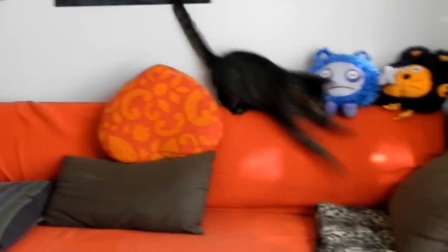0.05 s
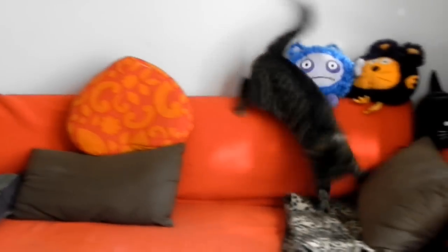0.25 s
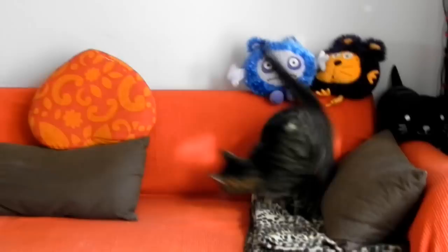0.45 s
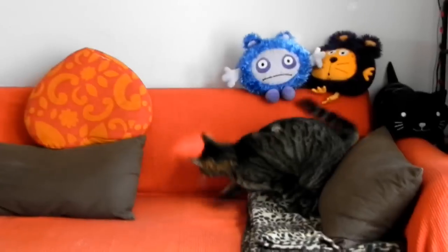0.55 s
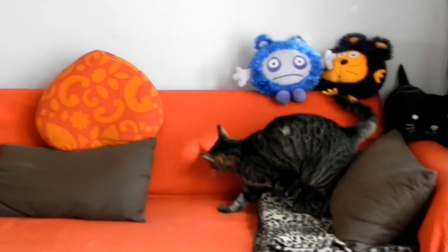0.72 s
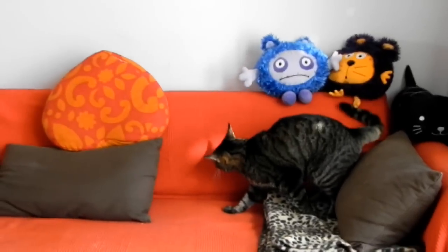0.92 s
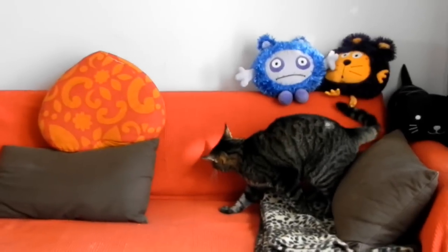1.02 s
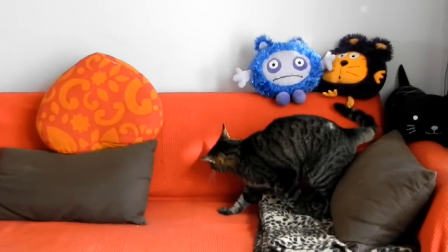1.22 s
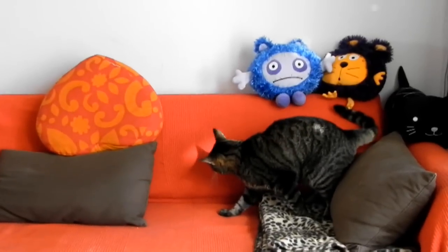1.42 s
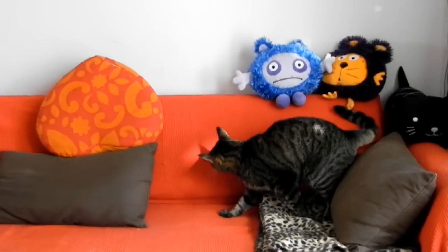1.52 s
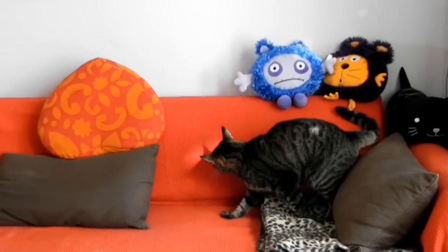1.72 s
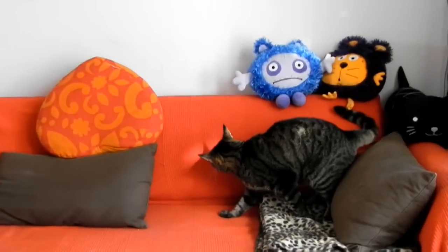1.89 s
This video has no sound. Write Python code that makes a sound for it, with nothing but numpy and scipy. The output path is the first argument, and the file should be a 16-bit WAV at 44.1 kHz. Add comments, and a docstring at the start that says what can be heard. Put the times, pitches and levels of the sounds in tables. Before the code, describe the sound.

A cat scrambles on a sofa: light scratchy cloth and soft paw bumps from 0 s, busier thuds and claw snags from 0.2 s, the strongest landing around 0.45 s. Smaller thumps follow, one clear at 0.74 s, ending by about 0.95 s. Faint lens-motor ticks, about fifteen a second, run from 0.6 s to the end over quiet room hiss and low wavering hum. A tiny fur brush comes near 1.1 s.

```python
"""Claws and cloth crackle over a quiet, humming room: a cat scrambles along a sofa back, drops and stops.
Shaped noise makes the cloth, fur and hush; wavering tones and narrow noise make the hum.
Paws thump as short swinging tones with a ringing frame and a slap of noise; snags are brief pings.
From before the cat stops, a lens motor inside the camera ticks fifteen times a second (rung noise pulses).
The stereo microphone hears bass in the middle and spreads the mids wide."""
import sys
import numpy as np
from scipy import signal
from scipy.fft import rfft, irfft
from scipy.io import wavfile
from scipy.ndimage import uniform_filter1d

SR = 44100
rng = np.random.default_rng(int(sys.argv[2]) if len(sys.argv) > 2 else 0)


def attenuation_scalar(level_db):
    """Turn a level in dB into a linear amplitude multiplier (20 dB per decade)."""
    decades = np.asarray(level_db, float) / 20
    return 10 ** decades


def transcribe(signal):
    """Save signal, clipped to [-1, 1], as a 16-bit WAV file at the path in sys.argv[1]."""
    frames = np.atleast_2d(signal).T
    limited = np.clip(frames, -1, 1)
    pcm = np.round(limited * 32767).astype(np.int16)
    wavfile.write(sys.argv[1], SR, pcm)


N = 85995  # length in samples

# Scrambling effort over time:
# [t/s, cloth level/dB before CLOTH_DB, frame shake level/dB before SHAKE_DB, spring sway level/dB, rasp 0-1]
EFFORT = [(0.0, -43, -32, -60, 0.93), (0.042, -49, -31, -48, 0.76), (0.074, -49, -43, -54, 0.3),
          (0.112, -46.5, -30.5, -57, 1), (0.15, -57.5, -40, -59, 0.94), (0.202, -45.5, -44, -46, 0.4),
          (0.228, -34, -26, -45, 0.09), (0.258, -43, -27.5, -57, 0), (0.302, -46.5, -30, -53.5, 0.4),
          (0.316, -39, -27, -46, 0.7), (0.35, -30.5, -27, -58, 0.71), (0.376, -34.5, -28, -62, 0.48),
          (0.438, -31.5, -31, -50, 0.27), (0.456, -32.5, -22, -51, 0.66), (0.48, -32, -19, -29.5, 0.38),
          (0.626, -56, -39.5, -56, 0.47), (0.666, -49, -27.5, -42, 0.44), (0.716, -53, -46, -44, 0.5),
          (0.738, -45, -28, -53, 0.85), (0.762, -52, -18, -49, 0.6), (0.798, -46.5, -29.5, -56, 0.34),
          (0.848, -70, -31, -46, 0.55), (0.866, -45.5, -34, -57, 0.35), (0.92, -58, -54, -73, 0.6)]
# Cloth scraped with full rasp: [f/Hz, relative level per Hz/dB]
RASPY_CLOTH = [(150, -19), (250, -5.5), (303, -9), (566, -10.5), (651, -12.5), (1610, -13.5), (3170, -23.5),
               (5830, -38.5), (16000, -51)]
# Cloth pressed without rasp: [f/Hz, relative level per Hz/dB]
DULL_CLOTH = [(150, -32), (250, -5), (723, -7), (1280, -25), (1610, -18.5), (1880, -37), (16000, -52.5)]
# Ways the sofa frame rings: [f/Hz, level/dB before weighting by ring length, ring length/s]
FRAME_MODES = [(97, -4.5, .1), (117.4, 0.5, 0.11), (176.4, 1, .07), (266.4, -2.5, 0.054),
               (339.3, -6.5, 0.07), (409.5, -2.5, 0.052), (554, -6.5, 0.044), (692, -3, 0.035)]
CLOTH_DB, SHAKE_DB = 2.5, -8.5  # added to the effort levels
GRAINS_PER_S, NUDGES_PER_S, GRAIN_SPREAD_DB = 1200, 1500, 4.0
SWAY_HZ, SWAY_WANDER_HZ, SWAY_WIDTH_HZ = 54, 1.9, 7.6  # pitch, its wander, how fast it wanders

# Hush in the middle: [f/Hz, relative level per Hz/dB]
HUSH_MID_SPECTRUM = [(15, -26), (25, -16), (70, -18), (113, -5), (161, -8), (222, -7.5), (307, -15),
                     (402, -3), (460, -10.5), (688, -5.5), (788, -12.5), (1120, -16), (1590, -16),
                     (1920, -18.5), (3860, -22.5), (8450, -31.5), (12300, -41), (15700, -39.5)]
# Hush at the sides: [f/Hz, relative level per Hz/dB]
HUSH_SIDE_SPECTRUM = [(15, -84), (25, -32), (113, -20.5), (161, -20), (268, -20.5), (402, -1.5),
                      (688, -10.5), (901, -11), (2720, -22), (3380, -25.5), (8000, -36.5), (12300, -48),
                      (15700, -48)]
# Wavering drones: [f/Hz, width of each of two filter passes/Hz, level/dB]
DRONES = [(54, 14, -67.5), (118, 15, -59.5), (250, 12, -56), (404.4, 25, -61), (544, 36, -64.5)]
HUSH_MID_DB, HUSH_SIDE_DB = -50, -43
TONE_HZ, TONE_DB, TONE_WAVER_HZ, TONE_SWELL_DB = 216.3, -53, 2.4, 2  # the steadiest drone

# How long each band of the room takes to fade by 60 dB: [f/Hz, t/s]
ROOM_FADE = [(100, 0.13), (500, 0.3), (2000, 0.29), (8000, 0.13)]
ROOM_DB = -11
# How wide the cat sounds: [f/Hz, level of side against mid/dB]
SIDE_LEVEL = [(60, -17.5), (150, -26), (300, -8), (600, -3), (2000, -2), (8000, -8.5), (15000, -6)]
LEAN = -0.45  # share of the mid put straight into the side: the cat is to the right
SCATTER_RAD = 3.38  # spread of phase between the two microphone ports
RIGHT_DB = 0.5  # the right port is a little more sensitive

# Paw landings: [t/s, landing level/dB, pitch f/Hz, number of swings, slap level against landing/dB]
LANDINGS = [(0.04, -31.5, 192, 2.9, -7.5), (0.181, -29.5, 192, 3.5, -12), (.219, -21.5, 185.8, 5.9, -16),
            (.267, -27, 125, 2.7, -17), (.317, -18, 368, 3.46, -14), (0.345, -19.5, 229, 4.3, -16),
            (.384, -26, 230, 4.2, -31), (0.408, -26, 401, 5.8, -20), (.452, -11.5, 200, 3.74, -12.5),
            (.456, -20, 118, 5.3, -12), (.483, -20, 193, 4.4, -10.5), (0.515, -21.5, 214, 5.5, -12),
            (.533, -34, 137, 2.6, -18.5), (0.59, -29.5, 390, 4, -8), (.640, -35, 160, 3.3, -6.5),
            (0.664, -39, 125, 4.5, -5), (.737, -17.5, 194.3, 4.27, -20), (.739, -27, 108, 3.7, -16),
            (.770, -30, 142, 2.9, -14), (0.802, -26.5, 152.6, 4.28, -15.5)]
# Pad slapping cloth: [f/Hz, relative level per Hz/dB]
SLAP_SPECTRUM = [(200, -17.5), (400, -7.5), (800, -8.5), (1500, -17.5), (2500, -21), (4000, -46),
                 (7500, -36), (16000, -55)]
RING_DB, PUSH_DB = -11.5, -3.5  # frame ring and cushion push, against the landing level
KNOCK_S, SLAP_RISE_S, SLAP_FADE_S = 0.003, 0.0032, 0.057  # the fade is by 60 dB
PUSH_LATE, PUSH_FLAT = 1.1, 0.4  # powers shaping the cushion's swell

# Brushes of fur, mostly treble: [start t/s, length t/s, level at the crest/dB]
FUR_BRUSHES = [(0.066, 0.09, -55), (0.21, 0.073, -57.5), (0.444, 0.014, -46), (0.54, 0.17, -59),
               (1.083, 0.072, -57.5), (1.106, 0.014, -54)]
# Sound of fur: [f/Hz, relative level per Hz/dB]
FUR_SPECTRUM = [(1000, -4), (2500, 13.5), (5000, 6), (9000, 3.5), (13000, -4.5), (16000, -11)]

# Claw snags: [t/s, level/dB, pitch f/Hz]
CLAW_SNAGS = [(.210, -21.5, 590), (0.225, -24.5, 1250), (0.331, -19.5, 2470), (.354, -12, 1160),
              (0.393, -30, 1700), (.451, -16, 1490), (.457, -11.5, 2010), (0.459, -32, 1060),
              (0.465, -18.5, 1500), (0.484, -27, 2150), (0.74, -37, 1190)]
SNAG_Q = 4.5  # higher rings longer

# Lens motor steps:
# [t/s, ring level/dB, knock level/dB before KNOCK_DB, knock f/Hz, zip level/dB before ZIP_DB]
MOTOR_STEPS = [(0.595, -42, -45, 684, -47.5), (0.6679, -41, -44, 540, -52.5),
               (0.7307, -39, -33.5, 515, -59), (0.7939, -41, -39, 543, -48.5),
               (0.8631, -43, -42.5, 470, -46), (0.9269, -34, -45, 544, -49),
               (0.9993, -42, -40.5, 672, -50.5), (1.066, -41.5, -41.5, 544, -52),
               (1.1293, -39, -41.5, 650, -47.5), (1.1977, -37.5, -44, 780, -53),
               (1.2625, -37, -47.5, 697, -46.5), (1.3287, -35, -44.5, 650, -50.5),
               (1.3959, -55, -40, 650, -46), (1.4634, -36, -41.5, 530, -50),
               (1.5328, -37.5, -39.5, 705, -54), (1.5938, -36.5, -39.5, 670, -50),
               (1.6644, -41.5, -42.5, 530, -54), (1.7318, -42, -45, 550, -51),
               (1.7963, -43.5, -40.5, 556, -43.5), (1.8651, -38.5, -43, 544, -51),
               (1.9281, -36, -38.5, 544, -47.5)]
# Resonances, each used as two filters in a row, the second three times as wide.
# Motor housing: [f/Hz, width/Hz of the first filter, level/dB]
HOUSING_MODES = [(1560, 110, 0), (1870, 120, -11), (2220, 120, -12)]
# Camera body: [f/Hz, width/Hz of the first filter, level/dB]
BODY_MODES = [(416, 68, -12.5), (522, 184, 0.5), (920, 93, -13)]
# Brief zip: [f/Hz, width/Hz of the first filter, level/dB]
ZIP_MODES = [(2600, 250, -4), (2950, 250, -7), (3900, 260, 0), (4500, 450, -3)]
STEP_S, KNOCK_STEP_S, ZIP_STEP_S = 0.0015, 0.0072, 0.003  # drive times; each push peaks at half its time
KNOCK_WIDTH_HZ = 105
KNOCK_DB, ZIP_DB, KNOCK_SIDE_DB = 4, 4, 1  # added to the step levels; the last for the side only


def evened(x):
    """Scales a sound to an average (rms) level of 1."""
    return x / np.sqrt(np.mean(x ** 2) + 1e-20)


def read(points, hz):
    """Reads a table between its points, with pitch on a log scale."""
    f, value = np.transpose(points)
    return np.interp(np.log(hz + 1), np.log(f + 1), value)


def add(mix, s, sound):
    """Adds a sound into the mix at time s, cutting it at the end."""
    part = mix[max(round(s * SR), 0):][:len(sound)]
    part += sound[:len(part)]


def colour(x, points):
    """Filters a sound to the given spectrum, with no sound ahead of its cause (minimum phase)."""
    hz = abs(np.fft.fftfreq(8192, 1 / SR))
    log_gain = np.log(attenuation_scalar(np.maximum(read(points, hz), -90)))
    phase = signal.hilbert(log_gain).imag
    taps = np.fft.ifft(np.exp(log_gain - 1j * phase)).real[:4096]
    return signal.oaconvolve(x, taps)[:len(x)]


def resonate(x, hz, width):
    """One resonance with a gain of about 1 at its pitch; a narrower one rings longer."""
    r = np.exp(-np.pi * abs(width) / SR)
    return 2 * signal.lfilter([1 - r], [1, -r * np.exp(2j * np.pi * hz / SR)], x).real


def slow(width):
    """Slow random wander: noise smoothed twice, after a second to settle."""
    smooth = resonate(rng.standard_normal(N + SR), 0, width)
    return evened(resonate(smooth, 0, width)[SR:])


def grains(per_s):
    """Sparse clicks at random times with random sign, a few of them large."""
    chance, sign, size = rng.random((N, 3)).T
    height = attenuation_scalar(-GRAIN_SPREAD_DB * np.log(size * 0.99 + 0.01))
    return (chance < per_s / SR) * np.sign(sign - 0.5) * height


def frame(x):
    """The sofa frame rings with its modes, alternately in and out of step."""
    out = 0
    for k, (hz, db, ring_s) in enumerate(FRAME_MODES):
        out = out + (-1) ** k * attenuation_scalar(db) * ring_s * resonate(x, hz, 1.5 / ring_s)
    return out


def scramble():
    """Claws and cloth crackle, small nudges shake the frame and springs sway, following the effort."""
    s, cloth_db, shake_db, sway_db, rasp = np.transpose(EFFORT)
    t = np.arange(N) / SR
    rasp = np.clip(np.interp(t, s, rasp), 0, 1)
    drag = evened(grains(GRAINS_PER_S)) + rng.standard_normal(N)
    cloth = rasp * evened(colour(drag, RASPY_CLOTH)) + (1 - rasp) * evened(colour(drag, DULL_CLOTH))
    nudges = uniform_filter1d(grains(NUDGES_PER_S), size=30)
    shake = evened(frame(nudges))
    sway_hz = SWAY_HZ + SWAY_WANDER_HZ * slow(SWAY_WIDTH_HZ)
    sway = np.sqrt(2) * np.sin(2 * np.pi * np.cumsum(sway_hz) / SR)
    # past the last row every part falls away
    out = cloth * attenuation_scalar(CLOTH_DB + np.interp(t, s, cloth_db, right=-99))
    out += shake * attenuation_scalar(SHAKE_DB + np.interp(t, s, shake_db, right=-99))
    out += sway * attenuation_scalar(np.interp(t, s, sway_db, right=-99))
    return out


def hush():
    """Room air and microphone hiss as shaped noise, plus low drones; returns mid and side."""
    mid_noise, side_noise = rng.standard_normal((2, N))
    mid = attenuation_scalar(HUSH_MID_DB) * evened(colour(mid_noise, HUSH_MID_SPECTRUM))
    side = attenuation_scalar(HUSH_SIDE_DB) * evened(colour(side_noise, HUSH_SIDE_SPECTRUM))
    for hz, width, db in DRONES:
        drone = resonate(rng.standard_normal(N), hz, width)
        mid += attenuation_scalar(db) * evened(resonate(drone, hz, width))
    tone_hz = TONE_HZ + TONE_WAVER_HZ * slow(8.7)
    tone = np.sqrt(2) * np.sin(2 * np.pi * np.cumsum(tone_hz) / SR)
    mid += attenuation_scalar(TONE_DB + TONE_SWELL_DB * slow(12)) * tone
    return np.array([mid, side])


def room(x):
    """Echoes blur into a short tail of noise, each band dying at its own speed."""
    hz, t, z = signal.stft(rng.standard_normal(SR // 2), SR, nperseg=256)
    fade = attenuation_scalar(-60 * t / read(ROOM_FADE, hz)[:, None])
    tail = signal.istft(z * fade, SR, nperseg=256)[1]
    return signal.fftconvolve(x, tail / np.linalg.norm(tail))[:N]


def stereo_side(cat):
    """The ports hear each pitch with a different phase; returns the side signal, room included."""
    z = rfft(cat)
    wander = uniform_filter1d(rng.standard_normal(len(z)), size=300)
    turn = SCATTER_RAD * evened(uniform_filter1d(wander, size=300))
    side = (LEAN + np.exp(1j * turn)) * z + attenuation_scalar(ROOM_DB) * rfft(room(cat))
    return irfft(side * attenuation_scalar(read(SIDE_LEVEL, np.fft.rfftfreq(N, 1 / SR))), N)


def paws():
    """Each landing: the cushion swings a few times, the frame rings on, the pad slaps the cloth."""
    out, t = np.zeros(N), np.arange(SR // 2) / SR
    ring = frame(np.sin(np.pi * np.minimum(t / KNOCK_S, 1)) ** 2)
    ring = attenuation_scalar(RING_DB) * ring / abs(ring).max()
    for s, db, hz, swings, slap_db in LANDINGS:
        u = np.minimum(t * hz / max(swings, 1), 1)  # 0 to 1 over the swings
        swell = abs(np.sin(np.pi * u ** PUSH_LATE)) ** PUSH_FLAT * (u < 1)
        push = attenuation_scalar(PUSH_DB) * swell * np.sin(2 * np.pi * hz * t)
        slap = evened(colour(rng.standard_normal(len(t)), SLAP_SPECTRUM))
        slap = slap * np.minimum(t / SLAP_RISE_S, 1) * attenuation_scalar(slap_db - 60 * t / SLAP_FADE_S)
        add(out, s, attenuation_scalar(db) * (push + ring + slap))
    return out


def brushes():
    """Fur brushes past: shaped noise that swells and fades in a smooth hump."""
    t, out = np.arange(N) / SR, np.zeros(N)
    fur = evened(colour(rng.standard_normal(N), FUR_SPECTRUM))
    for start, length, db in FUR_BRUSHES:
        out += fur * attenuation_scalar(db) * np.sin(np.pi * np.clip((t - start) / length, 0, 1))
    return out


def snags():
    """A claw catches and lets go: one short ping of thread and wood."""
    out, t = np.zeros(N), np.arange(1500) / SR
    for s, db, hz in CLAW_SNAGS:
        envelope = np.minimum(t * hz, 1) * np.exp(-np.pi * hz / SNAG_Q * t)
        add(out, s, attenuation_scalar(db) * envelope * np.sin(2 * np.pi * hz * t))
    return out


def motor_part(modes, db, step_s):
    """A short push of noise sets resonances ringing; the result is scaled to a peak level."""
    t, part = np.arange(2500) / SR, 0
    drive = rng.standard_normal(len(t)) * t / step_s * np.exp(-2 * t / step_s)
    for hz, width, mode_db in modes:
        ring = resonate(resonate(drive, hz, width), hz, 3 * width)
        part = part + attenuation_scalar(mode_db) * ring / abs(ring).max()
    return attenuation_scalar(db) * part / abs(part).max()


def motor():
    """Each step pings the housing, knocks the body and zips briefly; returns mid and side."""
    mid, side = np.zeros((2, N))
    for s, ring_db, knock_db, knock_hz, zip_db in MOTOR_STEPS:
        body = BODY_MODES + [(knock_hz, KNOCK_WIDTH_HZ, 0)]
        add(mid, s, motor_part(HOUSING_MODES, ring_db, STEP_S))
        add(mid, s, motor_part(body, knock_db + KNOCK_DB, KNOCK_STEP_S))
        add(mid, s, motor_part(ZIP_MODES, zip_db + ZIP_DB, ZIP_STEP_S))
        add(side, s, motor_part(body, knock_db + KNOCK_DB + KNOCK_SIDE_DB, KNOCK_STEP_S))
    return np.array([mid, side])


def scene():
    """Adds mid and side of every source and turns them into left and right."""
    cat = scramble() + paws() + brushes() + snags()
    cat_mid = cat + attenuation_scalar(ROOM_DB) * room(cat)
    mid, side = np.array([cat_mid, stereo_side(cat)]) + hush() + motor()
    balance = attenuation_scalar(np.array([[-RIGHT_DB / 2], [RIGHT_DB / 2]]))
    return np.array([mid + side, mid - side]) * balance


def low_pass(x):
    """Removes everything above the highest recorded frequency."""
    return signal.sosfilt(signal.butter(12, 17010, fs=SR, output="sos"), x)


def record(dry):
    """Turns the finished mix into the final sound."""
    return low_pass(dry)


dry = scene()
out = record(dry)
transcribe(out)
```